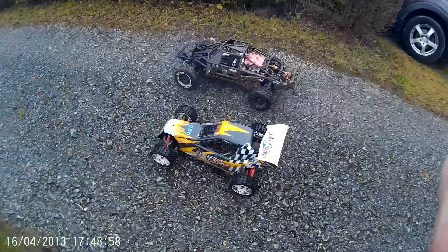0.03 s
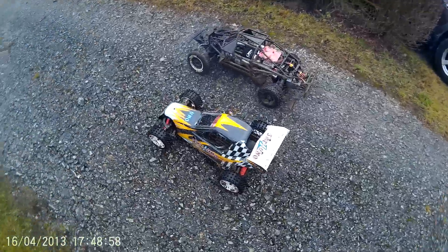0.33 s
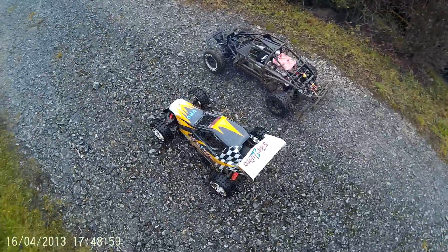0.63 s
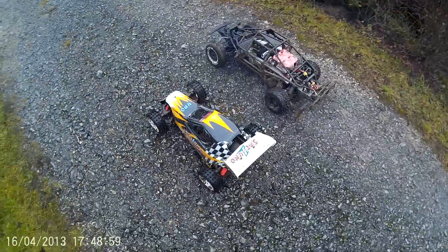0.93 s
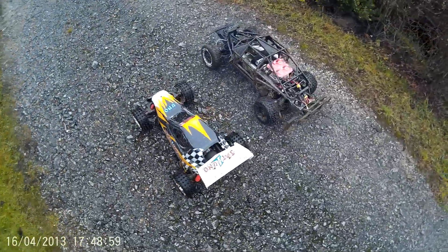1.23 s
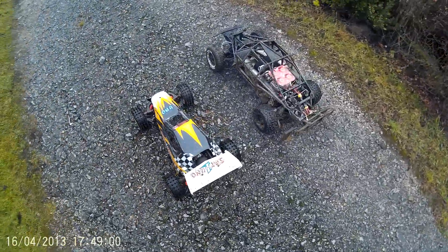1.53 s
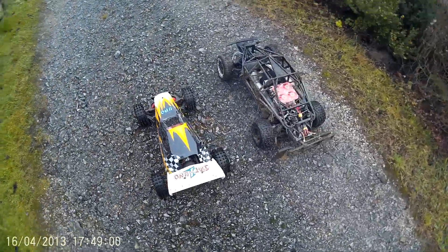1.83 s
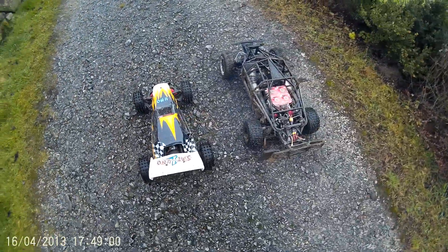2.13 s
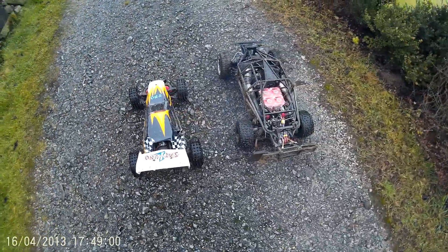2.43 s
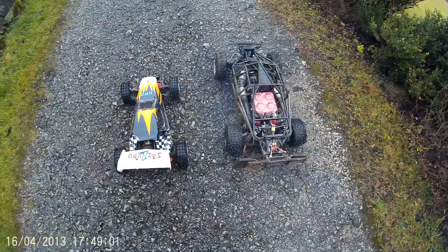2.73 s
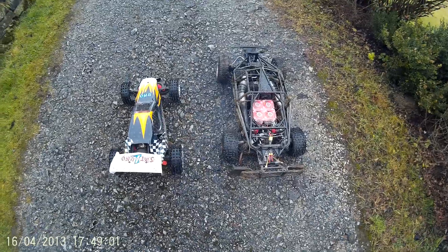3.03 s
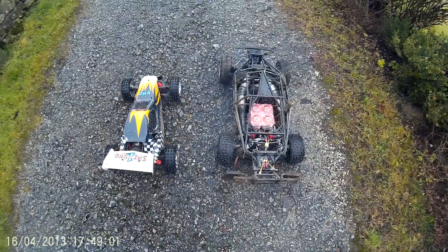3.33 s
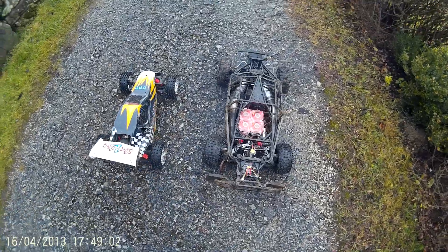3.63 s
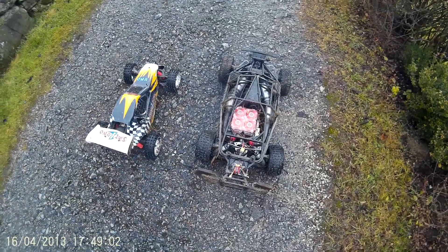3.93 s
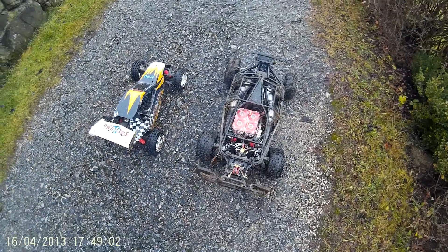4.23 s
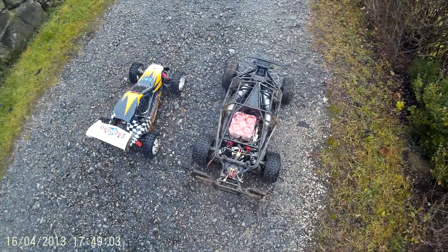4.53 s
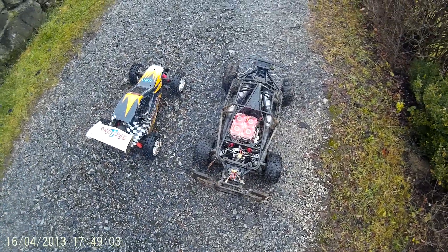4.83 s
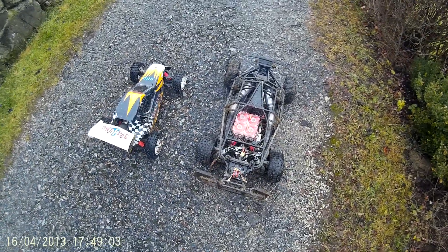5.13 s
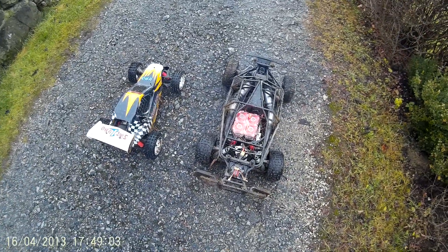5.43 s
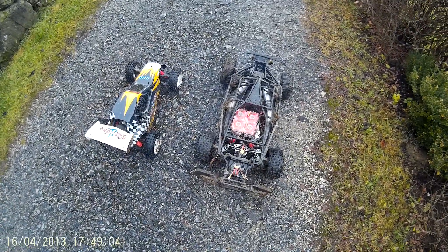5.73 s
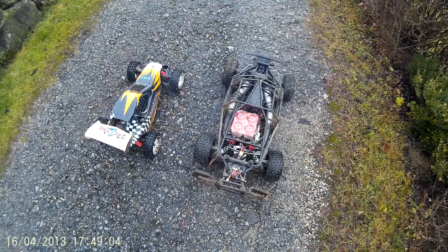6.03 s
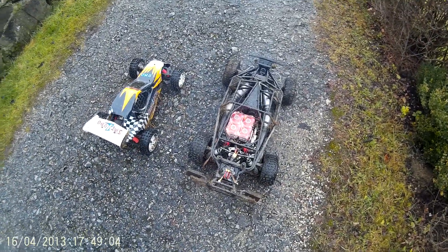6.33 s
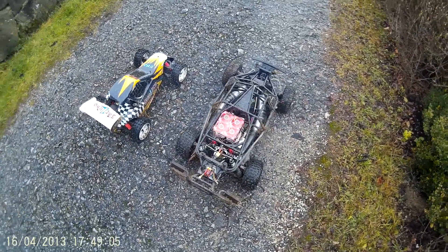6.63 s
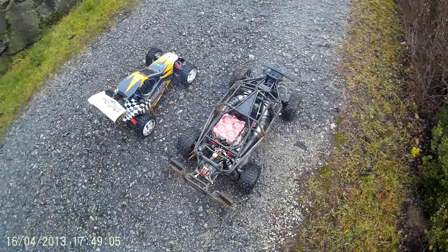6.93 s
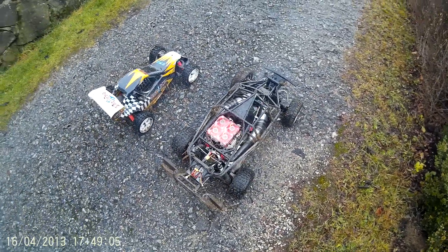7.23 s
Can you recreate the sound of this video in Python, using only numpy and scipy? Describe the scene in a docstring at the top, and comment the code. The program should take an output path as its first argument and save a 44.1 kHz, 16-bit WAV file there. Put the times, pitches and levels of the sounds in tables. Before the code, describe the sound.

Two small two-stroke model car engines idle outdoors with a steady burble, metallic rattle and irregular sharp pops.

```python
"""Outdoors on gravel, two model cars idle side by side, about two metres below a hand-held microphone.
Their small two-stroke petrol engines puff through the exhausts on every turn (near 64 and 79 a second),
but only some turns fire: the slow engine pops and cracks, the fast one rings its silencer.
Under the burble, engine metal and clutch parts rattle and sing. The tone shifts as the microphone
moves between the side of the cars and their exhausts."""
import sys
import numpy as np
from scipy import signal
from scipy.fft import rfft, irfft
from scipy.io import wavfile
from scipy.ndimage import uniform_filter1d

SR = 44100
rng = np.random.default_rng(int(sys.argv[2]) if len(sys.argv) > 2 else 0)


def wav_out(sig):
    """Save sig, one row per channel (or a flat mono array), as 16-bit PCM at SR to the path in sys.argv[1]."""
    wavfile.write(sys.argv[1], SR, np.round(np.clip(np.atleast_2d(sig).T, -1, 1) * 32767).astype(np.int16))


N = 330309
TIME = np.arange(N) / SR

# Levels in the tables are relative: each source adds its own gain.
# the microphone's walk round the cars: t/s, position (0 beside them, 1 behind the exhausts)
MIC_POSITION = [(0, 0.63), (1.5, 0.15), (2.3, 0.13), (3.5, 0.8), (5.2, 1), (6.3, 0.87), (7.49, 1)]
# each engine hunts about its idle speed: t/s, speed/(turns per s)
SLOW_SPEED = [(0.0, 64.8), (0.3, 66.7), (0.55, 64.4), (0.85, 64.3), (1.25, 61.2), (1.45, 65.9),
              (1.72, 65.1), (1.97, 62.6), (2.2, 64.7), (2.58, 61.2), (2.8, 61.4), (3.05, 64.3), (3.3, 63.8),
              (3.55, 60.4), (3.75, 63.2), (3.97, 64.5), (4.2, 63.1), (4.42, 61.6), (4.55, 62.9),
              (4.72, 62.3), (5.03, 64.0), (5.3, 62.9), (5.48, 65.5), (5.63, 63.0), (5.85, 66.3),
              (6.1, 65.0), (6.3, 62.4), (6.55, 63.6), (6.93, 65.4), (7.2, 60.9), (7.49, 62.7)]
FAST_SPEED = [(0.0, 81.3), (0.3, 78.2), (0.6, 81.2), (0.85, 76.9), (1.2, 78.2), (1.45, 81.2), (1.7, 79.7),
              (2.0, 79.5), (2.4, 77.2), (2.7, 80.8), (2.95, 78.8), (3.15, 76.4), (3.45, 80.2), (4.0, 77.2),
              (4.3, 80.6), (4.7, 79.0), (5.05, 76.8), (5.35, 81.9), (5.6, 77.3), (5.75, 79.3), (6.0, 76.8),
              (6.25, 80.6), (6.6, 80.2), (6.9, 79.4), (7.1, 75.8), (7.49, 77.8)]

# spectra of the two exhausts' puffs and of the slow pipe's thin shell: f/Hz, level/dB
SLOW_PUFF = [(20, -10.5), (64, -17), (100, -12), (170, -4), (280, -1.5), (440, 11), (520, -10),
             (720, -11.5), (880, -12), (1250, -27.5), (1900, -13.5), (2200, -28.5), (4000, -65),
             (16000, -56)]
FAST_PUFF = [(20, -34), (80, -19.5), (120, -3.5), (200, -1), (380, 3.5), (500, -4.5), (800, -5),
             (1200, -20.5), (1900, -5), (2300, -35), (8000, -44), (13000, -72)]
PIPE_SHELL = [(350, -46), (540, 0), (640, 4), (800, 0.5), (880, -14.5), (1300, -9), (1900, -9), (2200, -29),
              (5000, -66)]
# resonances of the two exhaust pipes: f/Hz, width/Hz, level/dB
SLOW_PIPE_MODES = [(252, 66, 2), (373, 44, -1), (451.8, 55, 1), (606, 290, -8.5), (813, 92, -6)]
FAST_PIPE_MODES = [(174.4, 61, -5), (200.2, 50, -2), (288, 31.5, 0.5), (334.5, 23, -3)]
# the slow pipe's hum on the first five multiples of the engine speed: level/dB
HUM_LEVELS = [-70, -45, -43.5, -32.5, -32.5]
# swell of that pipe's main note and of its undertone: t/s, level/dB
NOTE_LEVEL = [(0, -42), (.8, -34), (1.1, -26), (1.5, -27), (1.8, -33), (2.1, -30), (2.65, -27.5),
              (3.1, -43), (3.65, -36), (4.1, -26), (4.35, -36), (4.55, -27), (4.8, -33), (5.15, -26),
              (5.6, -30.5), (6, -31), (6.65, -26.5), (6.95, -30), (7.49, -30)]
UNDERTONE_LEVEL = [(0, -38), (.8, -37), (1.2, -29), (1.8, -34), (2.3, -33), (3, -38), (3.3, -28),
                   (3.8, -34), (4.05, -40), (4.35, -30), (4.6, -35), (4.85, -31), (5.4, -40), (6.3, -30),
                   (6.7, -40), (7.49, -42)]
# spectrum of the gas pulse that drives the fast engine's silencer can: f/Hz, level/dB
SILENCER_DRIVE = [(400, -11), (850, -9), (960, -3), (1100, -6), (1250, -5), (1600, -6.5), (1950, -9),
                  (2200, -24.5), (8000, -42)]
# resonances of the can: f/Hz, width/Hz, level/dB
SILENCER_MODES = [(1010, 180, -3), (1005, 96, 11.5), (1051, 29, 0.5), (1915, 140, 2)]
# the fast exhaust surges and slackens: t/s, level/dB
FAST_SURGE = [(0, 2), (.3, -0.5), (.55, -2.5), (.9, 2), (1.3, 2), (1.6, -2), (2, -2.5), (2.4, 0.5),
              (2.8, 0), (3.1, 0.5), (3.4, -1), (3.7, 2), (4.1, -1.5), (4.35, 2.5), (4.55, -1.5), (4.8, 2.5),
              (5.25, -.7), (5.7, 1), (6, 0), (6.3, 2.5), (6.55, 0), (6.8, 1.5), (7.1, 0), (7.49, 0.5)]

# spectra of the engines' rattle and of its thin top, strongest from behind: f/Hz, level/dB
RATTLE_SPECTRUM = [(300, -10), (2150, -6), (2450, 5), (3100, -5), (3900, -1), (4500, -2), (5250, 2),
                   (5600, -3), (5930, 1), (6250, -5), (7400, -5), (7850, -2), (8200, -5), (11000, -3),
                   (12400, -5), (12900, -16), (14200, -21), (15200, -10), (15900, -13)]
TOP_HISS = [(9000, -40), (12000, -10), (12900, -2), (13700, 0), (14300, -4), (15200, 2), (15900, -2)]
# broad ring of the cooling fins: f/Hz, width/Hz, level/dB
FIN_MODES = [(3870, 480, 6.5), (4080, 270, 2)]
# that ring at the moving microphone: t/s, level/dB
FIN_LEVEL = [(0, -49), (.5, -60), (.9, -44), (1.3, -49), (1.8, -60), (2.3, -60), (2.7, -54), (3.3, -57),
             (3.9, -52), (5.3, -50.5), (6.8, -48.5), (7.49, -46)]
# clutch and fins sing near 7, 9.5 and 11.5 kHz and sizzle near 12 kHz: f/Hz, width/Hz, level/dB
LOW_MODES = [(6990, 130, 3), (6700, 140, -2), (7370, 320, -23)]
MIDDLE_MODES = [(9260, 440, -22), (9520, 550, 4), (9300, 180, -11)]
HIGH_MODES = [(11481, 80, -1), (11664, 105, 0)]
SIZZLE_MODES = [(11904, 160, 0), (12080, 190, 0), (12400, 320, -3), (10550, 600, -7)]
# they beam unevenly at the moving microphone: t/s, low/dB, middle/dB, high/dB, sizzle/dB
METAL_LEVELS = [(0.0, -63, -93, -37.5, -41), (1.1, -54, -67, -34.5, -27), (1.5, -51, -67, -36, -30),
                (2.29, -54, -68, -39, -28), (2.77, -49, -55, -41, -22), (4.2, -49, -54, -33.5, -26.5),
                (5.28, -47, -50, -34, -33), (5.72, -46.5, -57, -39, -28), (6.25, -45, -50, -40, -32),
                (6.85, -41.5, -52, -41, -39), (7.1, -45, -49, -42, -40), (7.49, -42, -45, -43, -36)]

# clear firings of the slow engine: t/s, blast/dB, crack/dB, pipe ring/dB
SLOW_FIRINGS = [(0.004, -17, -30.5, -24), (0.066, -16, -25.5, -18.5), (0.129, -14.5, -17.5, -24),
                (0.204, -24, -16, -20), (0.278, -34, -47, -26), (0.339, -31, -34, -22),
                (0.399, -7.5, -17.5, -20.5), (0.488, -11, -17.5, -17), (0.578, -17, -37, -22),
                (0.655, -29, -37, -26), (0.717, -8, -31, -25), (0.821, -14, -27.5, -20),
                (0.892, -19, -34, -28), (0.94, -11, -46, -23), (1.257, -7.5, -19.5, -18),
                (1.32, -12.5, -22.5, -20.5), (1.382, -13, -23, -23), (1.444, -8.5, -32, -21),
                (1.496, -11, -29, -17), (1.549, -10, -21.5, -36), (1.624, -7, -18.5, -35),
                (1.711, -7.5, -21.5, -36), (1.986, -6, -25, -22.5), (2.08, -13, -30, -21),
                (2.141, -4, -20, -21), (2.342, -11, -30.5, -24), (2.406, -10.5, -36, -25),
                (2.584, -8, -27, -20), (2.681, -6, -20.5, -18), (2.761, -10, -33, -21),
                (2.824, -10.5, -33, -22.5), (2.873, -12, -35, -21), (2.937, -15, -35, -28),
                (2.999, -18, -35, -20), (3.062, -7, -22, -18.5), (3.14, -7, -24, -19),
                (3.201, -18.0, -50, -26), (3.265, -10, -25, -17), (3.553, -14, -42, -23),
                (3.619, -23, -49, -30), (3.668, -16, -35, -25.0), (3.718, -23, -35, -22),
                (3.765, -12, -28.5, -18), (3.827, -18, -23.5, -19), (3.89, -20, -29, -19.5),
                (3.951, -10.5, -23, -19.5), (4.013, -30, -48, -26), (4.077, -36, -55, -32),
                (4.139, -22, -51, -29), (4.234, -24.0, -44, -22), (4.432, -15, -31, -21),
                (4.498, -14, -28, -21), (4.56, -17, -34, -20), (4.704, -18, -46, -29.5),
                (4.771, -11, -34, -22), (4.821, -11, -35, -23), (4.885, -21, -30.5, -20),
                (4.933, -10, -22, -19), (4.995, -15, -36, -21), (5.057, -19, -45, -25),
                (5.105, -19, -29, -23), (5.153, -17, -38, -24.5), (5.2, -20, -36, -22),
                (5.246, -21, -43, -22), (5.293, -14, -30.0, -20), (5.37, -9.5, -24.5, -19.5),
                (5.449, -10.5, -20.5, -18), (5.526, -28, -46, -28), (5.573, -14, -30.5, -21.5),
                (5.634, -14, -26.5, -17.5), (5.695, -16, -23, -17.5), (5.755, -10, -22.5, -18),
                (5.83, -15, -22, -17.5), (5.889, -30, -50, -25), (5.95, -17, -35, -21),
                (6.011, -11, -28.5, -19.5), (6.072, -10, -32, -19), (6.197, -16, -36, -22),
                (6.309, -22, -33, -17), (6.371, -11, -20.5, -18), (6.435, -25, -40, -20.5),
                (6.483, -34, -34, -19.5), (6.545, -29, -47, -30), (6.593, -27, -24, -20),
                (6.656, -26, -27.5, -25.0), (6.717, -18, -25.5, -22), (6.779, -12, -28.5, -24),
                (6.836, -14, -20.5, -20), (6.916, -8, -19.5, -23), (6.99, -30, -44, -24),
                (7.116, -14, -40, -25), (7.179, -13, -34, -24.0), (7.24, -11, -24, -26),
                (7.319, -9, -20.5, -35), (7.395, -19, -31.5, -24.0), (7.474, -29, -40, -24)]
# spectra of a firing's pressure blast, bark of gas and cracking jet: f/Hz, level/dB
BLAST_SPECTRUM = [(30, -72), (200, 6.5), (450, -6), (650, 4), (1100, 2.5), (1500, -14.5), (2200, -25),
                  (4000, -20), (16000, -51)]
BARK_SPECTRUM = [(200, -23), (550, -6), (800, 2), (1300, -3), (2000, -5), (2800, -27), (4000, -36)]
CRACK_SPECTRUM = [(200, -12), (1000, 5), (1900, 6), (2700, -5), (3300, -9.5), (4300, -9), (5500, -2),
                  (6500, -4), (8500, -1.5), (9500, -1), (11300, 2), (12300, 2), (13000, -3), (14200, -7),
                  (15300, -3), (15900, -8)]
# the cylinder's ring under a piston tick: f/Hz, width/Hz, level/dB
CYLINDER_MODES = [(2356, 370, 5.5), (2660, 350, -5), (3850, 640, 5), (5170, 100, 3), (5900, 66, -1),
                  (8330, 350, -1)]
# the outlet's resonances heard all round, from the side and from behind: f/Hz, width/Hz, level/dB
OUTLET_MODES = [(2282, 160, -4), (2680, 260, -1), (3251, 140, -9), (3789, 180, -7), (4075, 220, -1),
                (4586, 170, -9), (5103, 230, -4), (5490, 260, 0), (5986, 180, -3), (6395, 170, -2),
                (6920, 220, -.5), (7385, 200, -2), (7751, 220, -4), (8268, 220, -4), (8770, 300, 0),
                (9300, 400, -5), (10206, 220, -4), (10572, 240, -3.5), (11111, 280, 4), (11700, 480, 3)]
OUTLET_SIDE_MODES = [(1830, 190, 13), (2573, 94, 8.5), (2884, 82, 3), (5360, 300, 5.5), (10200, 470, 0),
                     (11400, 290, -1)]
OUTLET_REAR_MODES = [(4620, 110, -3), (5140, 300, -3)]
# clear firings of the fast engine: t/s, piston tick/dB
FAST_FIRINGS = [(0.039, -37), (0.173, -40), (0.448, -37), (0.742, -34), (0.778, -41), (0.911, -33),
                (0.961, -36), (1.002, -33), (1.034, -34), (1.118, -32), (1.156, -36), (1.187, -41),
                (1.218, -25), (1.279, -30), (1.668, -36), (1.777, -38), (1.852, -39), (2.044, -40),
                (2.265, -37), (2.516, -36), (2.628, -34), (2.796, -39), (3.235, -37), (3.332, -39),
                (3.475, -40), (3.596, -34), (3.646, -34), (4.205, -37), (4.355, -32), (4.635, -38),
                (4.668, -35), (4.756, -35), (4.804, -37), (4.847, -35), (5.034, -37), (5.346, -33),
                (5.729, -37), (5.801, -41), (5.973, -35), (6.042, -37), (6.249, -34), (6.277, -38),
                (6.34, -39), (6.516, -32), (6.883, -30), (7.041, -40), (7.086, -31), (7.145, -37),
                (7.416, -34)]

GROUND_DELAY_S = .001538  # lag of the bounce off the gravel
DRONE_BEHIND_DB, PING_BEHIND_DB, BARK_BEHIND_DB = -3, 4, -20.5  # change from beside to behind the cars
FIRING_TIME = np.arange(round(.09 * SR)) / SR


def amp(db):
    """Decibels to gain."""
    return 10 ** (np.asarray(db) / 20)


def unit(x):
    """Scales to rms 1."""
    return x / np.sqrt(np.mean(x ** 2) + 1e-20)


def curve(table, column=1):
    """One column of a timed table at every sample."""
    rows = np.array(table)
    return np.interp(TIME, rows[:, 0], rows[:, column])


def behind(s):
    """How far round behind the exhausts the microphone is at time s, from 0 to 1."""
    return np.interp(s, *np.transpose(MIC_POSITION))


def add(mix, s, sound):
    """Mixes a sound in at time s."""
    part = mix[max(0, round(s * SR)):][:len(sound)]
    part += sound[:len(part)]


def wander(hz):
    """Slow random motion of rms 1, up to about the given rate."""
    f = np.fft.rfftfreq(N, 1 / SR)
    return unit(irfft(rfft(rng.standard_normal(N)) * np.exp(-(f / hz) ** 2), N))


def drift(x, share, hz):
    """Lets the pitch of a sound wander by a small share."""
    return np.interp(TIME + share * np.cumsum(wander(hz)) / SR, TIME, x, period=N / SR)


def response(spectrum, size=4096):
    """Minimum-phase impulse response of energy 1 with the given spectrum."""
    hz, db = np.transpose(spectrum)
    f = abs(np.fft.fftfreq(size, 1 / SR))
    log_gain = np.log(amp(np.interp(np.log(f + 1), np.log(hz), db)))
    impulse = np.fft.ifft(np.exp(np.conj(signal.hilbert(log_gain)))).real[:size // 2]
    return impulse / np.linalg.norm(impulse)


def colour(x, spectrum):
    """Shapes a sound with a broad spectrum."""
    return signal.oaconvolve(x, response(spectrum))[:len(x)]


def ring(x, modes, order=1):
    """Rings a set of resonances, at rms 1 in all; a higher order has steeper skirts."""
    total = 0
    for hz, width, db in modes:
        peak = np.concatenate(signal.iirpeak(hz, hz / width, SR))
        total += amp(db) * unit(signal.sosfilt([peak] * order, x))
    return unit(total)


def reverberate(x, decay_s):
    """Dense reflections inside a metal part, alike for every stroke, so a run keeps its pitch."""
    t = np.arange(round(.08 * SR)) / SR
    reflections = rng.standard_normal(len(t)) * np.exp(-t / decay_s)
    return unit(signal.oaconvolve(x, reflections)[:N])


def strokes(turns, uneven_db, jitter_s):
    """One impulse a turn, uneven in strength and timing."""
    starts = np.flatnonzero(np.diff(np.floor(turns)) > 0)
    strength, late = rng.standard_normal((len(starts), 2)).T
    starts = np.clip(starts + (late * jitter_s * SR).astype(int), 0, N - 1)
    train = np.zeros(N)
    train[starts] = amp(uneven_db * np.clip(strength, -2, 2))
    return unit(train)


def gusts(turns, decay_turns, floor):
    """Turbulence that flares once a turn and dies away towards a steady floor."""
    return unit((floor + np.exp(-(turns % 1) / decay_turns)) * rng.standard_normal(N))


def slow_exhaust(turns):
    """Puffs reach the microphone directly, through the pipe's resonances and through its thin shell."""
    pulses = strokes(turns, uneven_db=2.5, jitter_s=.0001)
    gas = gusts(turns, decay_turns=1, floor=.39)
    direct = amp(-25) * unit(colour(pulses + .6 * gas, SLOW_PUFF))
    pipe = amp(-31) * ring(colour(pulses + 1.1 * gas, SLOW_PUFF), SLOW_PIPE_MODES)
    shell_drive = .42 * reverberate(pulses, decay_s=.0052) + 1.46 * gas
    shell = amp(-31.5) * unit(colour(shell_drive, PIPE_SHELL))
    return direct + np.roll(pipe, round(.003727 * SR)) + shell  # the pipe answers a little late


def pipe_drone(turns):
    """The slow engine's pipe sings on multiples of its speed; main note and undertone swell and fade."""
    def tone(multiple, rough_rad):
        flutter = unit(amp(3 * wander(hz=22)))
        phase = 2 * np.pi * (multiple * turns + rng.random()) + rough_rad * wander(hz=30)
        return np.sqrt(2) * flutter * np.sin(phase)

    hum = sum(amp(db) * tone(k, rough_rad=.54) for k, db in enumerate(HUM_LEVELS, start=1))
    note = tone(7, rough_rad=.55) + amp(-11) * tone(10, rough_rad=.7)
    undertone = tone(6, rough_rad=.55)
    return hum + amp(curve(NOTE_LEVEL)) * note + amp(curve(UNDERTONE_LEVEL)) * undertone


def fast_exhaust(turns):
    """Softer puffs from the second car, and the hollow drone of its silencer can."""
    pulses = strokes(turns, uneven_db=2, jitter_s=.00059)
    gas = gusts(turns, decay_turns=.63, floor=.66)
    puffs = colour(pulses + .61 * gas, FAST_PUFF)
    pipe = np.roll(ring(puffs, FAST_PIPE_MODES), round(.004045 * SR))
    burble = amp(-32) * unit(puffs) + amp(-24.5) * pipe
    # gas bounces about in the can from one stroke to the next, so the drone hardly throbs
    inside = reverberate(strokes(turns, uneven_db=0, jitter_s=.0001), decay_s=.03)
    can = ring(colour(.073 * pulses + .58 * gas + .5 * inside, SILENCER_DRIVE), SILENCER_MODES)
    can = drift(can, share=.007, hz=7)  # its pitch shifts with the heat of the gas
    surge_db = curve(FAST_SURGE)
    can_db = -27.5 + DRONE_BEHIND_DB * behind(TIME) + .52 * surge_db
    return amp(surge_db) * burble + amp(can_db) * can


def rattle(slow_turns, fast_turns):
    """Pistons and gears knock every turn; the knocks spread through the metal, ringing clutch and fins."""
    fast_knocks = strokes(fast_turns, uneven_db=2.5, jitter_s=.00001)
    slow_knocks = strokes(slow_turns, uneven_db=7, jitter_s=.00001)
    hiss = gusts(fast_turns, decay_turns=.1, floor=1.3)
    spread = reverberate(fast_knocks, decay_s=.047) + .23 * reverberate(slow_knocks, decay_s=.0043)
    clatter = (spread + .95 * hiss) * amp(1.23 * wander(hz=30.8))
    drive = unit(clatter) + .5 * fast_knocks
    broad = ground_echo(colour(clatter, RATTLE_SPECTRUM), share=.4)
    metal = amp(-40 + .4 * behind(TIME)) * unit(broad)
    metal += amp(curve(FIN_LEVEL)) * ring(clatter, FIN_MODES, order=2)
    metal += amp(-48) * behind(TIME) * unit(colour(clatter, TOP_HISS))
    low_db = curve(METAL_LEVELS, 1) + 2 * wander(hz=4.7)
    metal += amp(low_db) * drift(ring(drive, LOW_MODES, order=2), share=.002, hz=12)
    metal += amp(curve(METAL_LEVELS, 2) + 1.5) * ring(drive, MIDDLE_MODES, order=2)
    metal += amp(curve(METAL_LEVELS, 3) - 8.5) * ring(drive, HIGH_MODES, order=2)
    return metal + amp(curve(METAL_LEVELS, 4) - 19.5) * ring(drive, SIZZLE_MODES, order=2)


def ground_echo(x, share):
    """Sound returns off the gravel a moment later, by a path that shifts as the microphone sways."""
    delay = GROUND_DELAY_S * (1 + .057 * wander(hz=.077))
    return (x + share * np.interp(TIME - delay, TIME, x)) / np.sqrt(1 + share ** 2)


def soft_firings(clear, turns, every=4, spread_db=2.5):
    """Weak firings every few turns in the pauses between clear ones: t/s, level offset/dB."""
    clear_times = [0] + [row[0] for row in clear] + [TIME[-1]]
    clear_turns = np.round(np.interp(clear_times, TIME, turns))
    soft_turns = []
    for start, end in zip(clear_turns, clear_turns[1:]):
        steps = max(1, int((end - start + 1) // every))
        soft_turns.extend(np.linspace(start, end, steps + 1)[1:-1])
    times = np.interp(np.round(soft_turns), turns, TIME)
    return zip(times, spread_db * rng.uniform(-1.3, 1, len(times)))


def flare(rise_s, decay_s, tail, tail_s=.016):
    """A burst of turbulence that peaks at once; a weaker tail scatters off the gravel."""
    t = FIRING_TIME
    shape = np.clip(t / rise_s, 0, 1) * (np.exp(-t / decay_s) + tail * np.exp(-t / tail_s))
    return shape / shape.max() * rng.standard_normal(len(t))


def pops(turns):
    """The slow engine fires: a pressure blast, a bark of gas, a tick, a cracking jet, a ringing pipe."""
    blast, bark, note, jet, tick = np.zeros((5, N))
    push = response(BLAST_SPECTRUM)
    push /= abs(push).max()
    soft = [(s, db - 20, db - 43.5, db - 38) for s, db in soft_firings(SLOW_FIRINGS, turns)]
    for s, blast_db, crack_db, ring_db in list(SLOW_FIRINGS) + soft:
        add(blast, s - .0006, amp(blast_db + .5) * push)
        add(blast, s + .00033, -amp(blast_db - 8.5) * push)  # suction behind the front
        add(blast, s + GROUND_DELAY_S, amp(blast_db - 9.5) * push)  # thrown back by the ground
        bark_db = crack_db + 4.5 + BARK_BEHIND_DB * behind(s)
        add(bark, s - .0005, amp(bark_db) * flare(rise_s=.0003, decay_s=.009, tail=.15))
        hz = 1696 + 2.7 * (crack_db + 29) + 10 * rng.standard_normal()  # harder firings leave hotter gas
        add(note, s, amp(ring_db) * pipe_note(hz, glide=.07, rise_s=.0014, decay_s=.0091, rough=.3))
        add(jet, s, amp(crack_db + .5) * flare(rise_s=.0008, decay_s=.0064, tail=.06))
        add(tick, s, amp(-41 + PING_BEHIND_DB * behind(s)) * piston_slap())
    crack = amp(-4.5) * ground_echo(colour(jet, CRACK_SPECTRUM), share=.8) + outlet_ring(jet)
    cylinder = tick.std() * ring(tick, CYLINDER_MODES, order=2)
    return blast + colour(bark, BARK_SPECTRUM) + note + cylinder + crack


def pipe_note(hz, glide, rise_s, decay_s, rough):
    """A pipe mode struck by hot gas: it starts sharp and sinks as the gas cools."""
    t = FIRING_TIME
    flutter = rough * unit(uniform_filter1d(rng.standard_normal((2, len(t))), size=150, axis=1))
    pitch = hz * (1 + glide * np.exp(-t / .0044))
    phase = 2 * np.pi * (np.cumsum(pitch) / SR + rng.random())
    swell = (1 - np.exp(-t / rise_s)) * np.exp(-t / decay_s)
    return swell / swell.max() * ((1 + flutter[0]) * np.sin(phase) + flutter[1] * np.cos(phase))


def piston_slap():
    """A piston slaps its cylinder: a short, crisp burst."""
    return flare(rise_s=.001, decay_s=.008, tail=.1)


def outlet_ring(jet):
    """Jets of gas ring the metal outlet; some resonances beam to the side, others to the rear."""
    all_round = amp(-1.5) * ring(jet, OUTLET_MODES, order=2)
    side = amp(-1.5) * (1 - behind(TIME)) * ring(jet, OUTLET_SIDE_MODES, order=2)
    rear = amp(-7) * behind(TIME) * ring(jet, OUTLET_REAR_MODES, order=2)
    return jet.std() * (all_round + side + rear)


def silencer_pings(turns):
    """The fast engine fires gently: each firing makes its silencer sing and its piston tick."""
    note, tick = np.zeros((2, N))
    soft = [(s, db - 43.5) for s, db in soft_firings(FAST_FIRINGS, turns)]
    for s, tick_db in list(FAST_FIRINGS) + soft:
        ping_db = -32 + PING_BEHIND_DB * behind(s) + 1.5 * rng.standard_normal()
        hz = 1910 + 22 * rng.standard_normal()
        add(note, s, amp(ping_db) * pipe_note(hz, glide=.037, rise_s=.0045, decay_s=.013, rough=.42))
        add(tick, s, amp(tick_db) * piston_slap())
    return note + tick.std() * ring(tick, CYLINDER_MODES, order=2)


def scene():
    """Both engines in the open air, in mono from about two metres above."""
    slow_turns = np.cumsum(curve(SLOW_SPEED)) / SR
    fast_turns = np.cumsum(curve(FAST_SPEED) * (1 + .012 * wander(hz=15))) / SR
    exhausts = slow_exhaust(slow_turns) + pipe_drone(slow_turns) + fast_exhaust(fast_turns)
    firings = pops(slow_turns) + silencer_pings(fast_turns)
    return (exhausts + firings + rattle(slow_turns, fast_turns))[None]


def record(dry):
    """The microphone's bass cut at 28 Hz and band limit at 15.74 kHz."""
    bass_cut = signal.butter(2, 28, "highpass", fs=SR, output="sos")
    band_limit = signal.firwin(1023, 15740, window=("kaiser", 9), fs=SR)
    return signal.oaconvolve(signal.sosfilt(bass_cut, dry), band_limit[None], "same")


dry = scene()
out = record(dry)
wav_out(out)
```